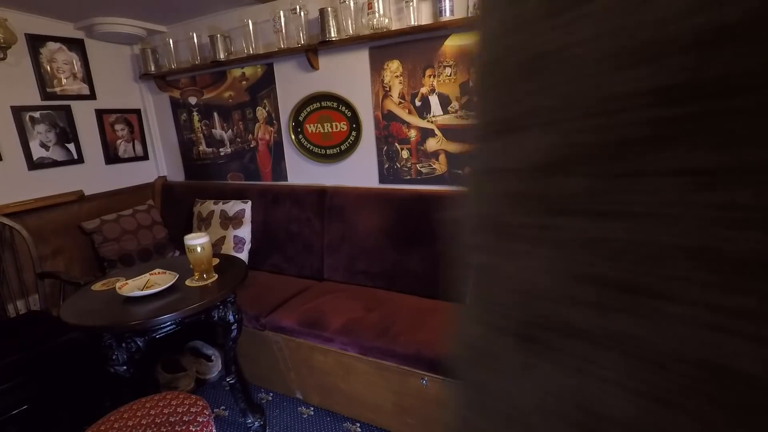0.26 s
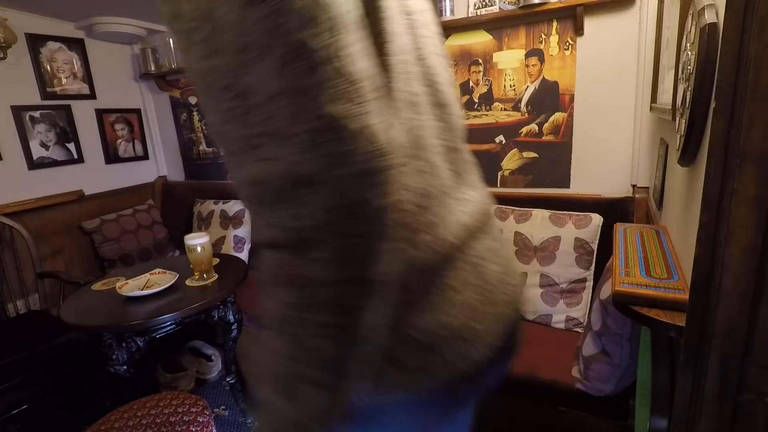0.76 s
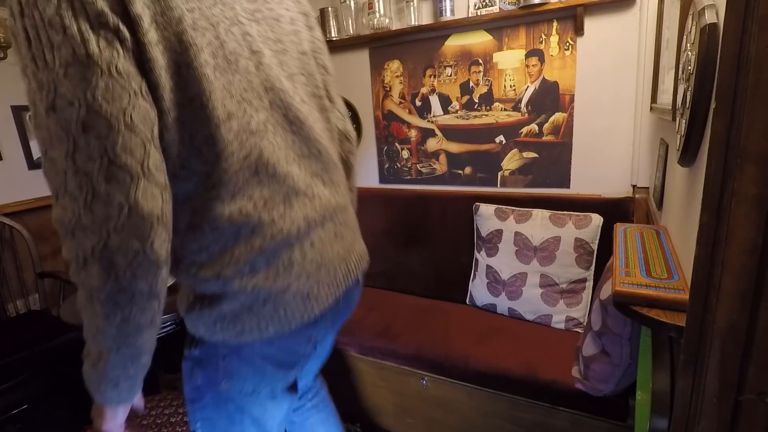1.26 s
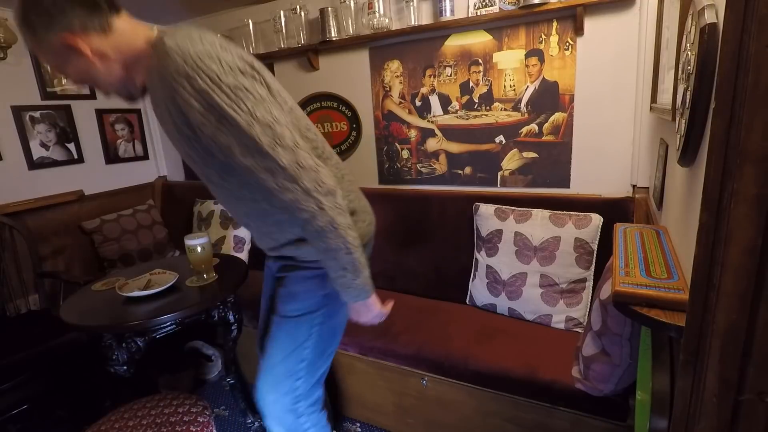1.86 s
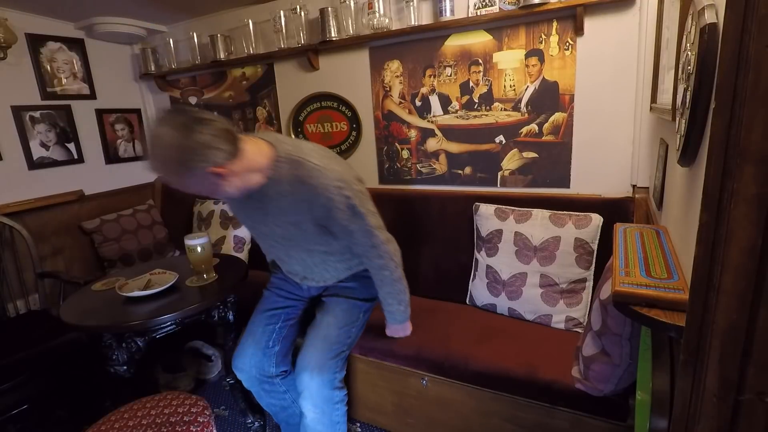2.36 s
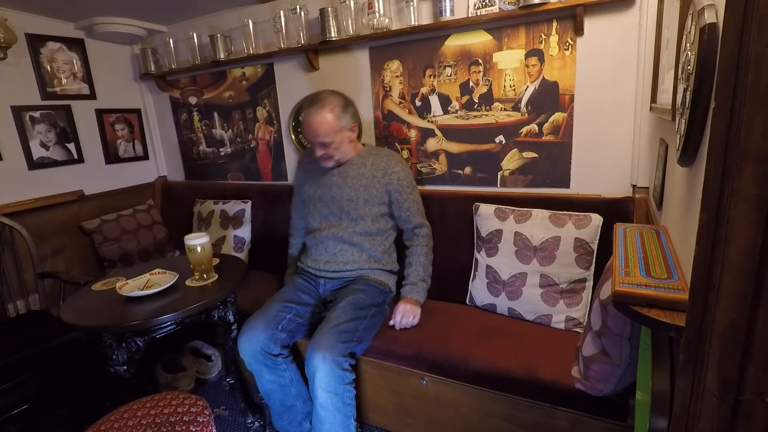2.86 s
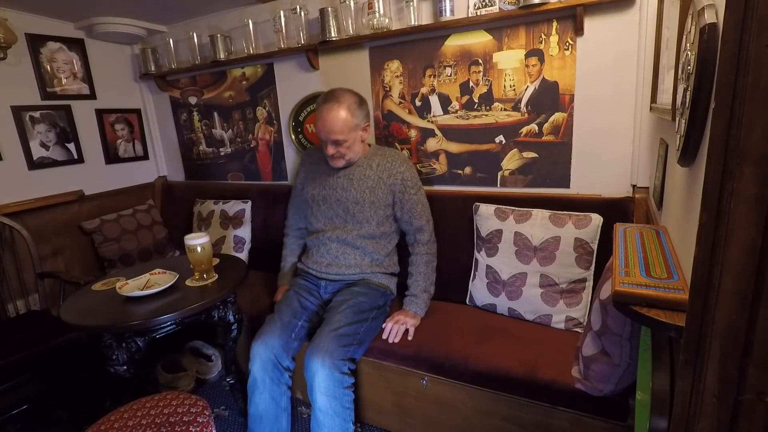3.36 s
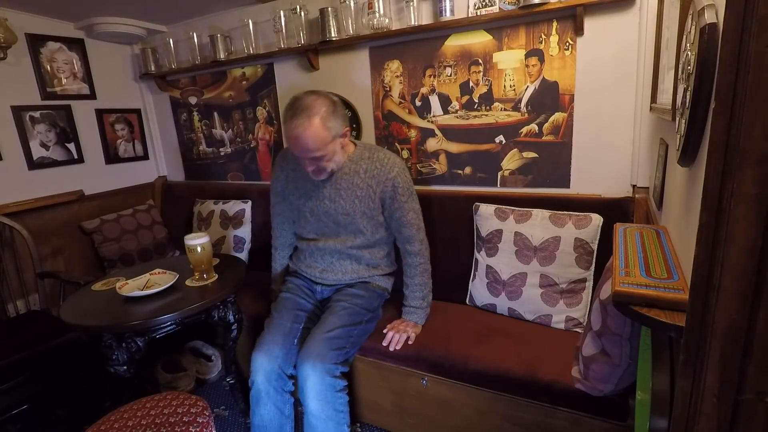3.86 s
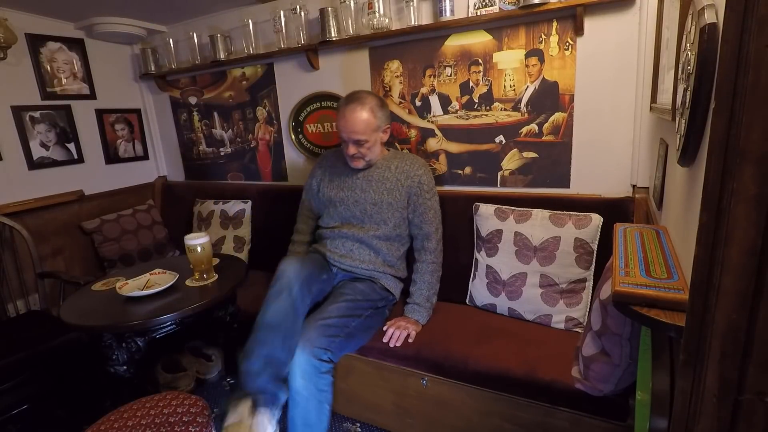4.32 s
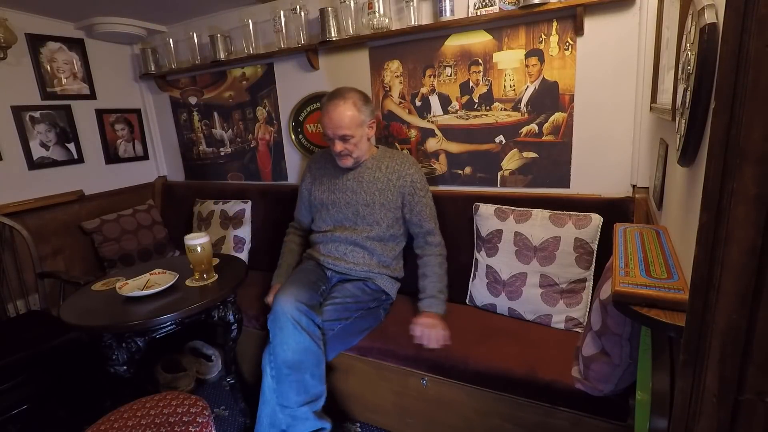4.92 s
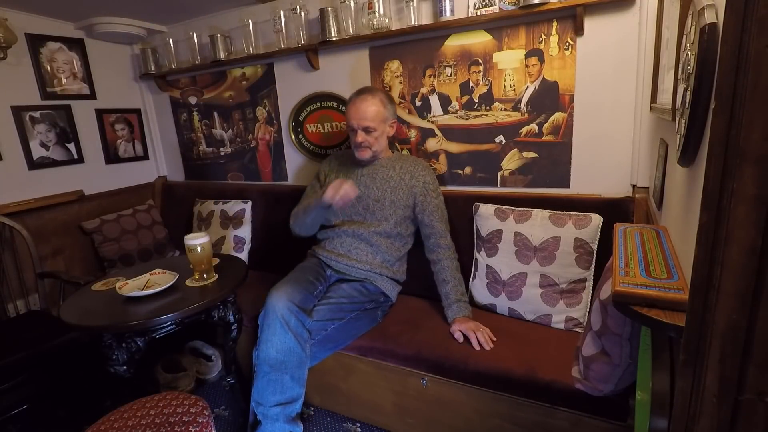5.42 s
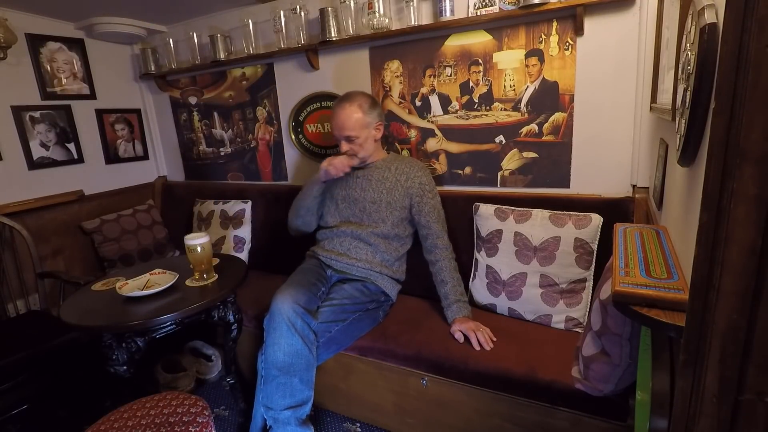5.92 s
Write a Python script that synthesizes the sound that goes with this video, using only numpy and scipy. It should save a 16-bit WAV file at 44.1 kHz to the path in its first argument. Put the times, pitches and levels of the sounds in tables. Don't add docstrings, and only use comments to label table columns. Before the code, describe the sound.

Heavy, booming footsteps on a carpeted board floor, a solid thump onto a cushioned wooden bench, then soft settling thuds, cloth rustle and small scuffs.

```python
import sys
import numpy as np
from scipy import signal
from scipy.fft import rfft, irfft, next_fast_len
from scipy.io import wavfile
from scipy.ndimage import uniform_filter1d

SR = 44100
rng = np.random.default_rng(int(sys.argv[2]) if len(sys.argv) > 2 else 0)


def wrap_up_sound(samples):
    columns = np.atleast_2d(samples).T
    tamed = np.clip(columns, -1, 1)
    steps = np.round(tamed * 32767).astype(np.int16)
    wavfile.write(sys.argv[1], SR, steps)


def elevation(decibels):
    levels = np.asarray(decibels, float)
    return 10 ** (levels / 20)


N = 272758
TIME = np.arange(N) / SR
OPPOSED = np.array([[1], [-1]])

# (time [s], level [dB])
SHIFT = [(0.0, -40), (.15, -38.5), (0.25, -34), (0.58, -53), (1.05, -38), (1.35, -44), (1.72, -33),
         (2.1, -42.5), (2.53, -30.5), (2.68, -37.5), (3.2, -38), (3.65, -38.5), (4.1, -39), (4.45, -40.5),
         (5.15, -38.5), (5.6, -43), (5.9, -42.5), (6.18, -52.5)]


def curve(table):
    s, *columns = np.transpose(table)
    return [np.interp(TIME, s, c) for c in columns]


def colour(x, table):
    hz, db = np.transpose(table)
    size = next_fast_len(x.shape[-1] + 4096)
    f_hz = np.maximum(np.arange(size // 2 + 1) * SR / size, 1)
    gain = elevation(np.interp(np.log(f_hz), np.log(hz), db))
    return irfft(rfft(x, size) * gain, size)[..., :x.shape[-1]]


def noise(table):
    x = colour(rng.standard_normal(N), table)
    return x / np.std(x)


def pair(table, likeness):
    c = np.clip(likeness, -1, 1)
    return np.sqrt((1 + c) / 2) * noise(table) + np.sqrt((1 - c) / 2) * noise(table) * OPPOSED


def walk(rate_hz):
    k = int(SR / rate_hz)
    held = np.repeat(rng.standard_normal(N // k + 1), k)
    return 1.18 * uniform_filter1d(uniform_filter1d(held, k), k)[:N]


def shape(rise_s, t60_s):
    rise_s, t60_s = max(rise_s, 1e-4), max(t60_s, .01)
    t = np.arange(int((t60_s + 4 * rise_s) * SR)) / SR
    env = (1 - np.exp(-t / rise_s)) ** 2 * np.exp(-np.log(1000) * t / t60_s)
    return t, env / env.max()


def add(out, s, x):
    i = int(s * SR)
    out[:, i:i + x.shape[1]] += x[:, :N - i]


def pan(db):
    return elevation(OPPOSED * db / 2)


def ring(hz, rise_s, t60_s, half_turns):
    t, env = shape(rise_s, t60_s)
    phase = 2 * np.pi * hz * t
    return env * np.array([np.sin(phase), np.sin(phase - np.pi * half_turns)])


def background():
    # (frequency [Hz], density [dB per Hz])
    hiss_mid = [(41, -42), (70, -36), (123, -8.5), (172, -3.5), (303, -7.5), (339, -6), (371, -9),
                (497, -10.5), (730, -14.5), (781, -14.5), (1230, -17), (4960, -37.5), (10200, -28.5),
                (14000, -44), (15300, -48)]
    hiss_side = [(47, -41), (80, -12), (121, -16), (145, 1), (251, -5), (320, -11), (357, -10), (389, -1.5),
                 (416, -10), (454, -8), (898, -6), (3510, -31.5), (10100, -28.5), (13700, -42.5),
                 (15300, -50)]
    mid = elevation(-49.5 + .4 * walk(3)) * noise(hiss_mid)
    side = elevation(-44.5 + 0.26 * walk(2.8)) * noise(hiss_side)
    hum_db = -28 + 0.56 * (curve(SHIFT)[0] + 38.5) + 0.95 * walk(4.27)
    hum = elevation(hum_db) * np.sin(2 * np.pi * 50 * TIME)
    side = side + hum * (1 + 0.082 * OPPOSED)
    cooler = elevation(-66.5) * noise([(1500, -30), (1690, 2), (1760, -4), (1950, -37)])
    side = side + cooler * OPPOSED
    return mid + side * OPPOSED


def murmur():
    spectrum = [(15, -31), (28, 10.5), (45, 4), (60, 1.5), (80, 6.0), (160, -7.5),
                (280, -9.0), (450, -13.0), (800, -49.0)]
    return elevation(curve(SHIFT)[0] + 2.0 * walk(9)) * pair(spectrum, 0.035)


def clothes():
    # (time [s], rustle level [dB])
    cloth = [(0.0, -44), (0.19, -43.5), (0.31, -46), (0.43, -56.5), (0.83, -53), (1.03, -49.5),
             (1.19, -55.5), (1.39, -50), (1.69, -50), (1.89, -52), (2.6, -51.5), (3.44, -54), (3.97, -53),
             (4.41, -46), (4.58, -61), (4.72, -50.5), (4.9, -54), (6.18, -56.5)]
    # (time [s], centre frequency [Hz], level [dB])
    slide = [
        (4.65, 3430, -73),
        (4.68, 3520, -64),
        (4.785, 3500, -53),
        (4.803, 2300, -49),
        (4.85, 2300, -43.5),
        (4.92, 2306, -48),
        (5.04, 2430, -51),
        (5.075, 2420, -65),
    ]
    rustle_db = curve(cloth)[0]
    low = pair([(400, -16), (900, -3.5), (2400, -5), (4500, -3.0), (6000, -21)], 0.82)
    low = elevation(rustle_db - 2.5 + 2.0 * walk(24.52)) * low
    high = pair([(3500, -50), (4800, 2.0), (7500, 1.5), (10000, 7.0), (14000, -15.0)], 0.2)
    high = elevation(rustle_db - 0.83 + 0.67 * walk(29.76)) * high

    hz, slide_db = curve(slide)
    narrow = pair([(10, -1), (100, -5), (220, -1), (600, -45)], 0.23)
    wide = pair([(10, 4), (240, 5), (450, -12), (1300, -34)], 0.39)
    band = np.where(hz < 2600, wide, narrow)
    phase = 2 * np.pi * np.cumsum(hz) / SR
    seam = elevation(-4.0) * (TIME > 4.75) * band[::-1, ::-1] * np.cos(.8 * phase)
    return low + high + elevation(slide_db) * (band * np.cos(phase) + seam)


def knocks():
    # (time [s], frequency [Hz], peak [dB], lag between ports [half turns])
    parts = [(.097, 1580, -43, .2), (.262, 4900, -40, .2), (0.2575, 235, -10.5, 0.11),
             (.266, 165, -10.5, 0.77), (0.273, 421, -14, 0.89), (.396, 350, -29.5, 0.19),
             (0.399, 400, -30.5, 0.5), (.94, 272, -18.5, 0.4), (.95, 1996, -33, .2), (.958, 660, -33, .3),
             (.972, 270, -26.5, 0.33), (0.985, 150, -35.5, 0.42), (1.003, 287, -33, 0.28),
             (.965, 1720, -30, .2), (1.656, 590, -43, 0.6), (1.658, 950, -36, 0.53),
             (1.812, 305, -32.5, 0.21), (2.344, 144, -20, 0.55), (2.346, 510, -24.5, 0.32),
             (2.347, 676, -17, 0.14), (2.348, 1236, -25, 0.27), (2.347, 880, -32, 0.11),
             (2.3495, 1730, -18, 0.12), (2.351, 2040, -23, .1), (2.3492, 2380, -18.5, 0.15),
             (2.3485, 4700, -36, .05), (2.349, 980, -27, .1), (2.449, 155, -21.5, 0.52),
             (2.581, 216.4, -17, 0.18), (2.353, 300, -11.5, 0.1), (2.333, 400, -29, .1),
             (2.575, 330, -23.5, 0.18), (2.603, 300, -28, 0.17), (4.533, 236, -40, 0.47),
             (4.532, 2980, -40, .2), (2.852, 258.1, -18.5, .01), (2.852, 510, -26.5, 0.045),
             (2.586, 370, -24, 0.59), (2.8535, 150, -14.5, 0.036), (4.635, 2540, -43, .2),
             (4.637, 2800, -39, .1), (5.060, 1370, -34, 0.02), (5.059, 470, -38, .05),
             (3.318, 245, -33.5, .3), (.289, 255, -19, .3), (.274, 560, -26, .5), (.309, 200, -21, .3),
             (.296, 1700, -40, .05), (5.905, 300, -43.5, .4), (5.062, 730, -35.5, 0.4),
             (5.065, 2170, -43, .2)]
    out = np.zeros((2, N))
    for s, hz, db, lag in parts:
        hard_share = 1 - 0.021 * max(db + 25.0, 0)
        t60_s = 68.6 / hz * (0.47 + lag) * hard_share
        pan_db = -2 * max(np.log2(595 / hz), 0)
        add(out, s, elevation(db) * pan(pan_db) * ring(hz, 0.51 / hz, t60_s, lag))
    return out


def boards():
    # (time [s], force [dB], hardness [dB per mode group], off-centre [0-1])
    thuds = [(.259, -17.5, -10.5, 0.56), (.272, -18, -1.5, 0.96), (0.293, -25.5, 2.5, 0.33),
             (0.396, -34.5, 1, 0.77), (0.486, -41, -9, 1), (.927, -29, -9.5, 0.78), (.948, -17, -2.5, 0.87),
             (1.099, -45.5, -7, 0.97), (1.54, -49, 0, 0.25), (1.662, -34.5, 1, 0.7), (1.785, -29, -1, 0.53),
             (1.812, -43, -13, 0.85), (2.332, -27, -9, 0.3), (2.349, -15, -2.5, 0.42),
             (2.469, -30.5, 5, 0.3), (2.579, -24.5, -8, 0.53), (2.608, -39, -15, 0.64),
             (2.851, -17, -9, 0.35), (2.94, -30, -3.5, 0.23), (3.031, -47, -15.5, 0.42),
             (3.327, -35, -10, 0.94), (4.2105, -24.5, -8.5, 0.51), (4.53, -39, -1.5, 0.52),
             (4.60, -34.5, -9.5, 0.62), (4.7, -43, -9, 0.48), (5.06, -42, 2, 0.4), (5.138, -21, -8.5, 0.38)]
    # (frequency [Hz], level [dB], t60 [s])
    low_modes = [(139.2, 7, 0.074), (91.4, -5, 0.5), (111.4, 1.5, 0.3), (132, -12, 0.59),
                 (164.9, -1.5, 0.34), (196, -5.5, 0.24)]
    middle_modes = [(295, -1.5, 0.026), (225.7, -5, 0.27), (256.3, 2.5, 0.15), (280.6, 0.5, 0.2),
                    (297.2, -6, 0.12), (350.4, -4, 0.098), (380, -15.5, 0.49)]
    upper_modes = [(632, 1, 0.017), (462.5, 5, 0.11), (506, 2, 0.21), (589, -5, 0.26), (676, -3, 0.11),
                   (720, -8, 0.31), (892, -8.5, 0.26), (990, -20, 0.24)]
    opposition = [0.92, 0.65, 1.17]
    # loading time [s], shorter for square blows
    contact_s = [0.0041, 0.0047, 0.0015]
    readiness_db = [0.6, 3, -0.4]
    out = np.zeros((2, N))
    chance = rng.standard_normal((len(thuds), 3, 8, 3))
    for (s, force_db, hard_db, off), luck in zip(thuds, chance):
        group_db = force_db + hard_db * np.arange(-1, 2) + readiness_db
        sides = pan(0.5 + 0.49 * hard_db)
        for g, modes in enumerate((low_modes, middle_modes, upper_modes)):
            rise_s = contact_s[g] * (0.38 + off)
            for (hz, db, t60_s), (detune, strike, spread) in zip(modes, luck[g]):
                lag = off * (opposition[g] + 0.29 * spread)
                mode = ring(hz * (1 + 0.0289 * detune), rise_s, t60_s, lag)
                dull_db = -11.0 * max(.5 - off, 0) * g * np.log2(hz / 300)
                mode_db = group_db[g] + db + dull_db - 8 + 2.1 * strike
                add(out, s, elevation(mode_db) * sides * mode)
    return out


def joists():
    # (time [s], frequency [Hz], peak [dB], rise [s], t60 [s])
    rocking = [(0.26, 56.66, -4.5, 0.033, 1.), (.39, 56.6, -7.5, 0.015, 0.46),
               (0.929, 63, -4.5, 0.0093, 0.28), (0.968, 58.6, -4, 0.011, 0.81),
               (1.661, 61, -23, 0.016, 0.22), (1.79, 60, -14, .04, 0.51), (1.948, 62.6, -23, 0.02, 0.41),
               (2.337, 60.8, -2, 0.047, 0.44), (2.441, 61.3, -9, 0.067, 0.64),
               (2.578, 66.2, -5, 0.012, 0.075), (2.85, 58.5, -11, 0.025, 0.45),
               (2.961, 60.8, -8.5, 0.011, 0.33), (3.311, 59.9, -21, 0.03, 0.61),
               (4.21, 53.7, -27, 0.016, 0.28), (4.589, 61.6, -16, 0.029, 0.96), (5.134, 57, -21, .02, 0.2),
               (5.24, 64.4, -32, .02, 0.44)]
    # (time [s], frequency [Hz], peak [dB], t60 [s])
    bounce = [(0.272, 57.37, -11.5, 0.9), (0.714, 61.4, -37.5, 0.1), (.82, 59, -35, 0.38),
              (0.939, 62.9, -4, 0.34), (0.986, 59.35, -17, 0.76), (1.4, 54.3, -36.5, 3.5),
              (1.665, 65, -30.5, 0.29), (1.792, 61.05, -25, 0.98), (1.838, 67, -21, 0.15),
              (2.336, 69.7, -14.5, 0.18), (2.402, 60.6, -12.5, 1), (2.585, 68.2, -18, 0.22),
              (2.721, 58.8, -26, 0.28), (2.851, 67.08, -13.5, 0.76), (2.89, 60.1, -12.5, 0.66),
              (2.939, 68.2, -4.5, 0.11), (2.986, 58.6, -10, 0.23), (3.323, 60.2, -21, 0.65),
              (3.325, 80.6, -27.5, 0.44), (4.011, 65, -32.5, 0.23), (4.215, 60.8, -25, 0.65),
              (4.53, 64.4, -28, 0.12), (4.588, 62.2, -19.5, 0.99), (5.07, 66, -29, 0.2),
              (5.136, 67.5, -17, 0.39), (5.205, 59.6, -22.5, 0.69)]
    # (pitch ratio [1], level [dB], share of t60 [1])
    neighbours = [(0.82, -14, 0.6), (1.222, -11.5, 0.67)]
    # (time [s], frequency [Hz], peak [dB], t60 [s])
    sway = [
        (.30, 25.64, -18.5, 1.04),
        (0.939, 32.7, -15.5, 0.28),
        (1.047, 24.28, -23.5, 1.6),
        (1.799, 26.3, -20.5, 0.25),
        (2.349, 26.5, -29, 2.3),
        (2.87, 32.5, -40, .5),
        (2.98, 25.2, -21.5, 0.96),
        (3.332, 31.76, -18, 0.48),
        (4.599, 23.3, -21, 0.6),
        (5.14, 31.7, -14, 0.87),
    ]
    # (pitch ratio [1], level [dB], lag between ports [half turns])
    legs = [(1.002, 3.5, 0.99), (1.301, -1, 0.68)]
    out = np.zeros((2, N))
    for s, hz, db, rise_s, t60_s in rocking:
        add(out, s, elevation(db) * ring(hz, rise_s, t60_s, 0.93))
    for s, hz, db, t60_s in bounce:
        lag = 0.87 - 0.04 * (hz - 59)
        start_s, rock_hz = max(row[:2] for row in rocking if row[0] <= s + .004)
        done = 2 * rock_hz * (s - start_s)
        for ratio, near_db, share in [(0.98, 0.01, 1)] + neighbours:
            swing = ring(hz * ratio, 0.011, t60_s * share, lag - done)
            add(out, s, elevation(db + near_db) * swing[[1, 1]])
    for s, hz, db, t60_s in sway:
        rise_s = 0.0367 - 0.00527 * (hz - 25)
        for ratio, leg_db, lag in legs:
            add(out, s, elevation(db + leg_db) * ring(hz * ratio, rise_s, t60_s, lag))
    return out


def scuffs():
    # (time [s], peak [dB], brightness [dB per octave], rise [s])
    rubs = [(0.265, -32.5, -4, 0.0025), (.269, -39, -6, .0006), (0.292, -29.5, 2, 0.0046),
            (.468, -44.5, 0, 0.0017), (0.92, -32, -0.5, 0.0062), (.95, -33.5, -4, 0.0083),
            (.968, -41.5, -4, .001), (1.028, -50, -1, 0.0032), (1.139, -32, -0.5, 0.00031),
            (1.659, -42.5, -4.5, 0.0027), (1.773, -33.5, 0.5, 0.0058), (1.817, -38, -1, 0.00037),
            (2.333, -37, -1.5, 0.0019), (2.336, -41, -5, .002), (2.349, -31, -3, 0.0006),
            (2.3505, -22.5, -13.5, 0.00035), (2.452, -40.5, 1, 0.0017), (2.475, -39, -6, 0.0015),
            (2.582, -38, -3, 0.002), (2.852, -49, -6, .0015), (2.929, -38.5, -1.5, 0.0018),
            (2.942, -31.5, -2, 0.00036), (3.22, -41.5, 0.5, 0.028), (3.33, -48, -4, 0.0025),
            (4.522, -29, 2.5, 0.013), (4.55, -34, 1, 0.015), (4.585, -50, -1, 0.0025),
            (4.633, -35.5, 0, 0.00053), (5.059, -39, -6, 0.001), (5.9, -42.5, -2, 0.004)]
    out = np.zeros((2, N))
    grit = elevation(walk(500))
    dull = pair([(300, -4), (600, 1.0), (1000, 0.5), (2500, -7.5), (4000, -14.0), (9000, -35)], 0.32)
    bright = pair([(1200, -7), (2500, 0.0), (4000, 3.0), (8000, 1.0), (14000, -6.5)], 0.58)
    parts = (grit * dull, -1.1, 1.2), (grit * bright, 1.1, .9)
    for s, db, tilt_db, rise_s in rubs:
        t60_s = 8.6 * rise_s + min(0.22 - 0.0381 * (db + 33.5), .4)
        for part, lean, last in parts:
            t, env = shape(rise_s, t60_s * last)
            env = env * (1 + 0.93 * np.exp(-rise_s / 0.0028) * np.exp(-t / 0.0031))
            piece = part[:, int(s * SR):][:, :len(env)]
            add(out, s, elevation(db - 10.5 + lean * tilt_db) * env[:piece.shape[1]] * piece)
    return out


def tails():
    # (time [s], peak [dB], brightness [dB per band], t60 [s])
    echoes = [(.268, -39, -2.5, 0.23), (.955, -38, -3, 0.16), (2.352, -28.5, -4, 0.27),
              (2.59, -46, -8, 0.26), (2.858, -35.5, -11.5, 0.35), (4.535, -42.5, -5, 0.25),
              (4.58, -49, -5, .2), (5.066, -47, -7, .2), (5.145, -42.5, -10, .3), (5.78, -53, -14, .4),
              (5.86, -52, -12, .4), (5.92, -51, -12, .35)]
    # (centre frequency [Hz], share of t60 [1])
    bands = [(420, 1.18), (800, 1.03), (1500, 1.04), (2700, 0.5)]
    out = np.zeros((2, N))
    for k, (hz, share) in enumerate(bands):
        spectrum = [(hz / 8, -70), (hz / 1.68, 0), (hz * 1.47, 0), (hz * 4, -70)]
        band = elevation(2.4 * walk(150)) * pair(spectrum, 0.32)
        for s, db, tilt_db, t60_s in echoes:
            env = shape(0.0031, t60_s * share)[1][:N - int(s * SR)]
            add(out, s, elevation(db + k * tilt_db) * env * band[:, int(s * SR):][:, :len(env)])
    return out


def cracks():
    # (time [s], peak [dB], contact [s])
    snaps = [
        (.2695, -30, .0003),
        (.2962, -30, .00012),
        (1.1405, -38, .0001),
        (2.3492, -19, .00012),
        (2.3503, -25, .00003),
        (2.3535, -26, .00012),
        (2.9425, -32, .0001),
        (4.6345, -36, .0001),
        (5.0601, -34, .00025),
        (5.1385, -28, .0005),
    ]
    out = np.zeros((2, N))
    for s, db, contact_s in snaps:
        u = np.arange(int(8 * contact_s * SR) + 2) / SR / contact_s - 4
        add(out, s, elevation(db) * np.array([[1], [.9]]) * -u * np.exp((1 - u ** 2) / 2))
    return out


def squeaks():
    # (time [s], frequency [Hz], level [dB], length [s])
    whistles = [
        (2.611, 1325, -42, 0.032),
        (2.655, 1280, -47, .03),
        (4.605, 3700, -53, .03),
        (4.545, 2050, -49, 0.053),
        (4.2, 3700, -57, 0.045),
        (4.66, 3550, -58, 0.052),
        (4.70, 3500, -57, 0.05),
        (4.75, 3590, -54.5, 0.05),
        (4.757, 2840, -50, .035),
    ]
    out = np.zeros((2, N))
    width_hz = 49
    flutter = pair([(width_hz, 0), (8 * width_hz, -70)], 0.55)
    for s, hz, db, length_s in whistles:
        t = np.arange(int(length_s * SR)) / SR
        unsteady = .75 + .9 * flutter[:, int(s * SR):][:, :len(t)]
        env = np.sqrt(np.sin(np.pi * t / length_s)) * unsteady
        add(out, s, elevation(db) * env * np.sin(2 * np.pi * hz * t))
    return out


def scene():
    # (frequency [Hz], gain [dB])
    housing = [(300, 3), (1000, -2.5), (2400, 0.5), (4800, -5), (6500, 3), (7700, 0.5), (8500, -6),
               (11000, -14.5), (15000, -37)]
    near = colour(scuffs() + clothes() + cracks(), housing)
    floor = joists() + boards() + knocks() + murmur()
    return floor + near + background() + tails() + squeaks()


def low_pass(x):
    return signal.sosfilt(signal.butter(12, 15570, fs=SR, output="sos"), x)


def record(dry):
    # (frequency [Hz], gain [dB])
    left_port = [(5000, 0), (7800, -1), (8600, -2.5), (11000, -3.5), (12500, 0.5)]
    ports = np.array([colour(dry[0], left_port), dry[1]])
    top_cut = signal.ellip(8, .2, 60, 15000, fs=SR, output="sos")
    ports = signal.sosfilt(top_cut, ports)
    return low_pass(np.clip(ports, -1, 1))


dry = scene()
out = record(dry)
wrap_up_sound(out)
```